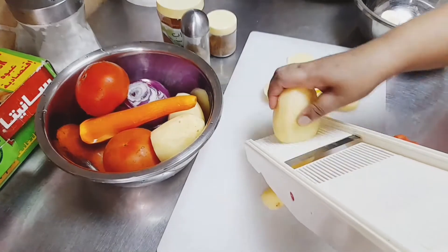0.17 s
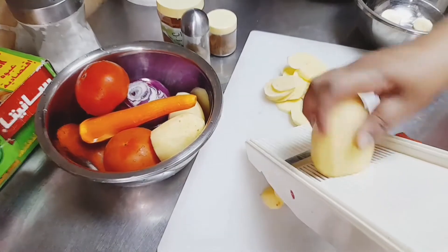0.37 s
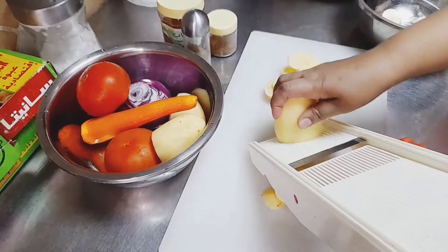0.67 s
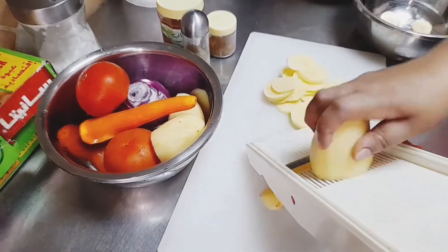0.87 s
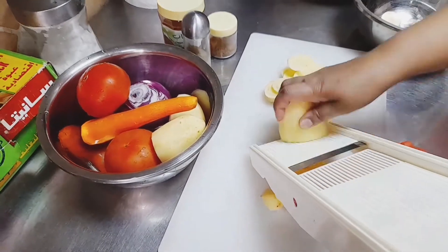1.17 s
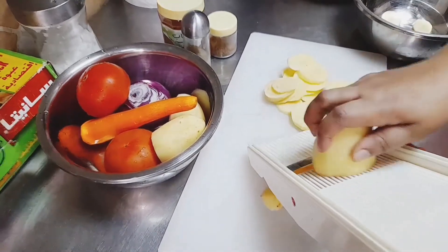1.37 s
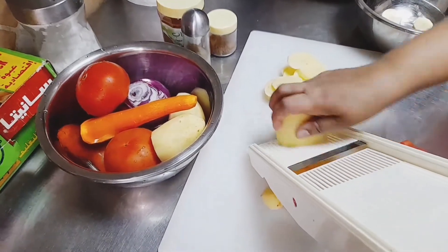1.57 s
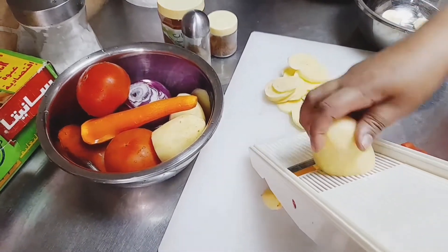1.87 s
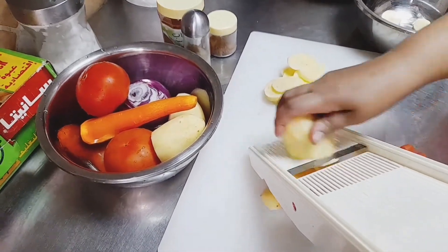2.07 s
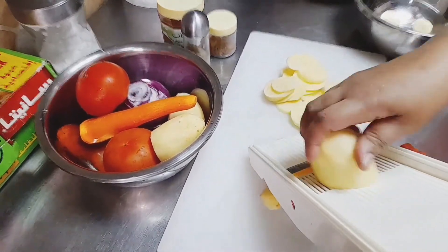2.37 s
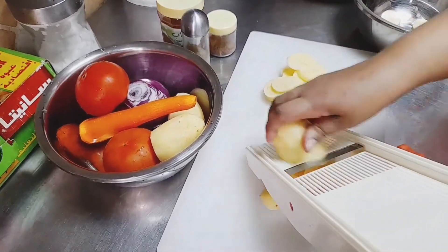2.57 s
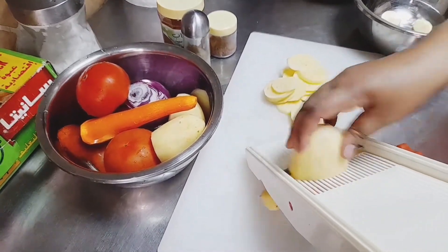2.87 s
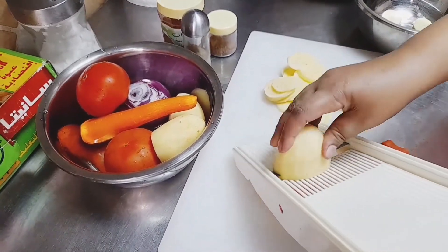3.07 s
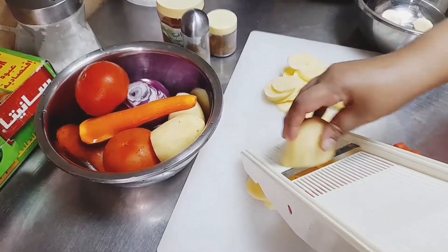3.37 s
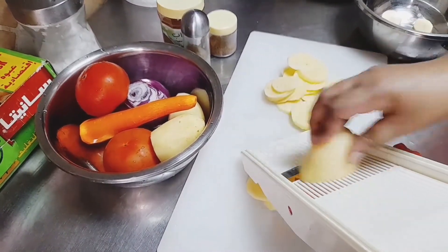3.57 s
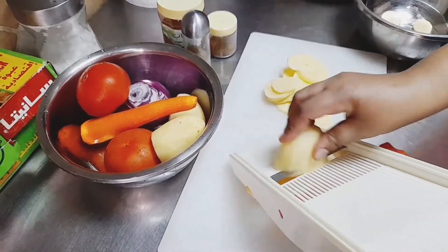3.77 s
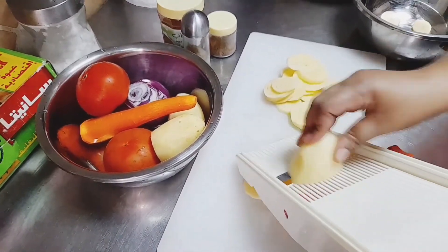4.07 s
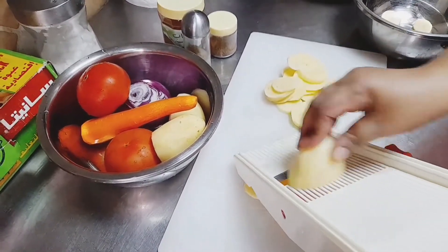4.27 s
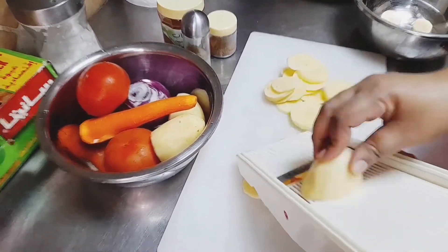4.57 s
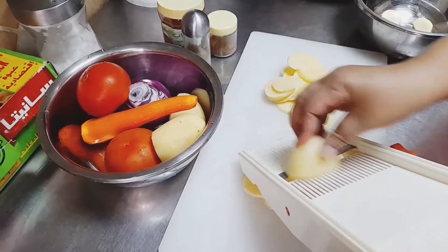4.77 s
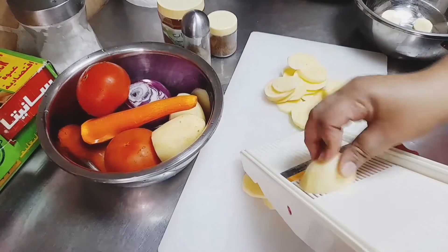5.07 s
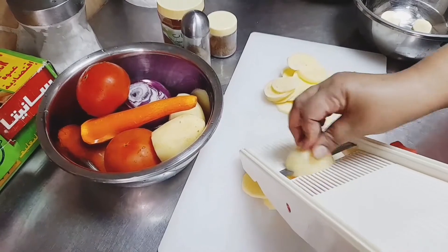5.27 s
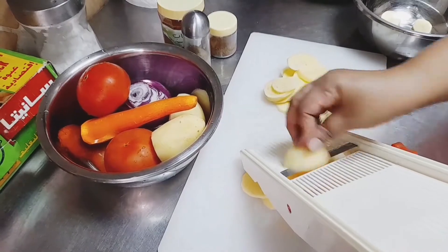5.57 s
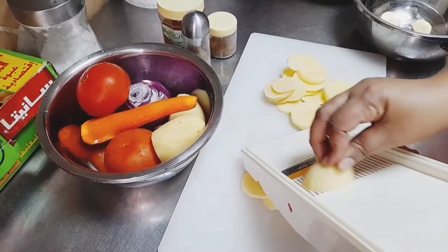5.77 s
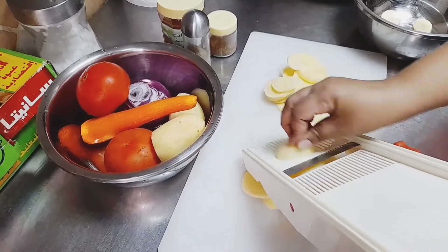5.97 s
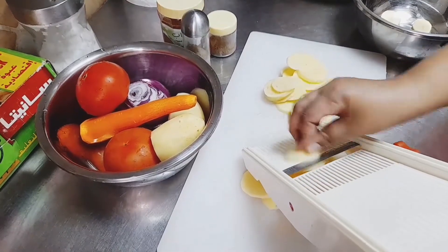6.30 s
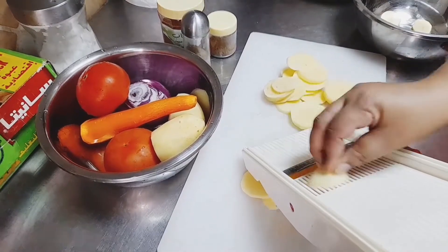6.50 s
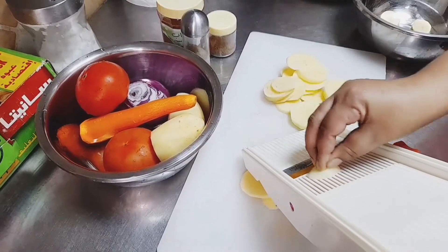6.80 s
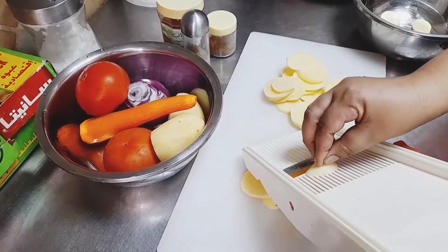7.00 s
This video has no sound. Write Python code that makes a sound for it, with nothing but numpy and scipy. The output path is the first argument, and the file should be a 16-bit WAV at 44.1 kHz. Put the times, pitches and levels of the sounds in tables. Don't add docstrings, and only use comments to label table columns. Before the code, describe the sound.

Close stereo phone pickup in a small hard kitchen. A potato strikes a slicer blade with a sharp plastic knock and wet crack, then rasps briefly along the ribs; softer return drags follow. Strokes come about every half second, quicker and shorter in the later part. Dull drops on the board, a few light steel clinks and a low counter boom lie beneath, with quiet fridge drone.

```python
import sys
import numpy as np
from scipy import signal
from scipy.fft import rfft, irfft, next_fast_len
from scipy.io import wavfile
from scipy.ndimage import uniform_filter1d

SR = 44100
rng = np.random.default_rng(int(sys.argv[2]) if len(sys.argv) > 2 else 0)


def waveform_to_disk(signal):
    frames = np.transpose(np.atleast_2d(signal))
    scaled = np.clip(frames, -1, 1) * 32767
    samples = np.round(scaled).astype(np.int16)
    wavfile.write(sys.argv[1], SR, samples)


def natural_amplitude(level_db):
    exponent = np.asarray(level_db, float) / 20
    return 10 ** exponent


N = 314765


def unit(x):
    return x / np.sqrt(np.mean(x ** 2) + 1e-20)


def along(points, hz):
    f, v = np.transpose(points)
    return np.interp(np.log(hz + 1), np.log(f + 1), v)


def wobble(rate):
    knots = int(N * rate / SR) + 2
    return 1.51 * np.interp(np.arange(N) * rate / SR, np.arange(knots), rng.standard_normal(knots))


def filtered(x, response):
    m = next_fast_len(N + SR // 2)
    gain = response(np.fft.rfftfreq(m, 1 / SR))
    gain = gain / np.sqrt(np.mean(abs(gain) ** 2))
    return irfft(rfft(x, m) * gain, m)[..., :N]


def ringing(modes):
    def response(f):
        return sum((-1) ** k * natural_amplitude(db) * 1j * f * width / (centre ** 2 - f * f + 1j * f * width)
                   for k, (centre, width, db) in enumerate(modes))
    return response


def colour(spectrum):
    return lambda f: natural_amplitude(along(spectrum, f))


def grit(spiky_db):
    size = natural_amplitude(spiky_db * wobble(900) + .5 * spiky_db * wobble(120))
    return unit(size * rng.standard_normal((2, N)))


def patchy(x, depth_db):
    z = signal.stft(x, nperseg=256)[2]
    field = uniform_filter1d(rng.standard_normal(z.shape[1:]), size=5, axis=0)
    field = uniform_filter1d(field, size=8, axis=1)
    return signal.istft(z * natural_amplitude(depth_db * unit(field)), nperseg=256)[1][:, :N]


def bursts(s, peak_db, length, rise, response, size=4096):
    ms = np.arange(size) / SR * 1000
    fall = natural_amplitude(peak_db[:, None] - 60 * ms / np.maximum(length, 5)[:, None])
    shape = fall * (1 - np.exp(-ms / np.reshape(rise, (-1, 1)))) ** 2
    push = shape[:, None] * rng.standard_normal((len(s), 2, size))
    rung = irfft(rfft(push) * response(np.fft.rfftfreq(size, 1 / SR)), size)
    energy = np.linalg.norm(shape, axis=1)[:, None, None]
    rung = rung * energy / np.linalg.norm(rung, axis=2, keepdims=True)
    out = np.zeros((2, N + SR))
    for at, one in zip(np.round(s * SR).astype(int), rung):
        out[:, at:at + size] += one
    return out[:, :N]


def tones(rows, rise, width_hz, size=4096):
    s, db, hz, length = np.transpose(rows)
    return bursts(s, db, length, rise, ringing([(hz[:, None, None], width_hz, 0)]), size=size)


# f/Hz, level/dB
AIR_SPECTRUM = [(15, -23), (25, -52), (55, 7.5), (124, -41), (159, -1.5), (192, -10), (313, -6.5),
                (433, -17.5), (483, -16), (1180, -26), (3910, -39), (15800, -32), (16100, -69.5)]
# f/Hz, level/dB
DRONE_TONES = [(161.5, -63), (11343, -87)]


def fridge():
    t = np.arange(N) / SR
    drone = sum(natural_amplitude(db + 6.5 + 1.9 * wobble(2)) * np.sin(2 * np.pi * hz * t + 0.34 * wobble(2.9))
                for hz, db in DRONE_TONES)
    air = natural_amplitude(-54.5) * filtered(rng.standard_normal((2, N)), colour(AIR_SPECTRUM))
    return air + drone * [[1], [0]]


# t/s, length/ms, rasp level/dB, frame level re rasp/dB
CUTS = [(0, 108, -33.5, -8.5), (0.929, 114, -35, -7), (1.388, 132, -35, -7), (2.403, 94, -34.5, -6),
        (2.837, 71, -33.5, -4), (3.557, 67.4, -32.5, -8), (4.033, 83, -32.5, -16), (4.371, 19.2, -35, -5.5),
        (4.601, 53.6, -31.5, -1), (4.866, 57.5, -33, -8.5), (5.112, 55, -34, -6.5),
        (5.413, 28.7, -36.5, -2.5), (5.68, 33, -53.5, -14), (5.802, 36, -42, -0.5), (5.861, 61, -35.5, -15),
        (6.232, 69, -34.5, -4), (6.517, 60.4, -36.5, -4)]
# t/s, rise/ms, length/ms, rasp level/dB, frame level re rasp/dB
RETURNS = [
    (0.47, 1.9, 120, -36.5, -11.5),
    (1.949, 33, 116, -34.5, -15),
    (2.509, 14, 65, -37, -9),
    (3.109, 18, 58, -36, -47),
    (3.745, 38, 55, -36.5, -15),
    (6.713, 36, 29, -39.5, -6),
]
# t/s, length/ms, rasp level/dB, swell/dB
BRUSHES = [(1.16, 50, -59, -14.5), (1.34, 29, -55, -16), (2.252, 107, -63.5, 17.5), (3.02, 73, -51.5, -2.5),
           (3.3, 270, -80.5, 33.5), (4.22, 80, -57, 5), (4.43, 35, -54, 1.5), (4.5, 37, -52.5, 5),
           (5.29, 65, -57, -6), (5.47, 300, -66.5, 7.5), (7.07, 65, -81, 17.5)]


def strokes():
    cut_rise_ms, cut_sag_db = 8.9, 2
    brush_rise_ms, brush_frame_db = 30, -1.5
    cuts = [(s, cut_rise_ms, ms, db, db - cut_sag_db, frame_db) for s, ms, db, frame_db in CUTS]
    returns = [(s, rise, ms, db, db, frame_db) for s, rise, ms, db, frame_db in RETURNS]
    brushes = [(s, brush_rise_ms, ms, db, db + swell_db, brush_frame_db) for s, ms, db, swell_db in BRUSHES]
    return cuts + returns + brushes


# f/Hz, level/dB
RASP_SPECTRUM = [(1060, -4), (1800, -0.5), (3000, -1), (3380, 0.5), (5680, -1.5), (6530, 1), (8700, -6),
                 (11500, 0), (14300, -2.5), (15800, -3), (16100, -76)]
# f/Hz, width/Hz, level/dB
FRAME_MODES = [(712, 110, -7), (851, 45, -8), (1102, 24, -1.5), (1259, 61, 3), (1455, 83, -1),
               (1735, 147, -6.5), (2028, 32, -3), (2394, 93, -12)]
# f/Hz, width/Hz, level/dB
HOLLOW_MODES = [(248, 94, -12), (313.3, 26.4, -0.5), (468, 74, -1), (613, 28, -6)]


def slide():
    ms, rub, shake = np.arange(N) / SR * 1000, np.zeros(N), np.zeros(N)
    for s, rise, length, early_db, late_db, frame_db in strokes():
        corners = 1000 * s + np.array([-1, 0, min(rise, length), length, length + 14])
        levels = [-150, early_db - 7, early_db, late_db, late_db - 14.5]
        level = natural_amplitude(np.interp(ms, corners, levels, right=-150))
        rub = rub + level
        shake = shake + natural_amplitude(frame_db) * level
    drag = natural_amplitude(0.65 * wobble(30) + 0.65 * wobble(80))
    torn = patchy(grit(spiky_db=0.13), depth_db=2.0)
    rasp = filtered(natural_amplitude(-1.5) * rub * drag * torn, colour(RASP_SPECTRUM))
    frame = filtered(natural_amplitude(-3.5) * shake * drag * grit(spiky_db=-2.5), ringing(FRAME_MODES))
    hollow = filtered(natural_amplitude(-8.0 + 4.4 * wobble(25)) * shake * grit(spiky_db=6.5), ringing(HOLLOW_MODES))
    return rasp + frame + hollow


# t/s of most weight, level/dB
SHOVES = [(.02, -40.5), (.2, -37.5), (.43, -35.5), (.58, -35), (.89, -37.5), (1.05, -39), (1.16, -41),
          (1.39, -35.5), (1.75, -45), (2.09, -41.5), (2.46, -39.5), (2.63, -45), (2.83, -31), (3.26, -38.5),
          (3.5, -43), (3.61, -42), (3.82, -41.5), (4.06, -35), (4.472, -41.5), (4.58, -35.5), (4.831, -35),
          (4.99, -41.5), (5.11, -37.5), (5.47, -43.5), (5.69, -42), (5.97, -40.5), (6.18, -40.5),
          (6.33, -44.5), (6.5, -39.5), (6.78, -45.5)]


def pressure():
    lean_db_per_s, ease_db_per_s, rest_db = 122, 87, -61.5
    t, weight = np.arange(N) / SR, natural_amplitude(rest_db)
    for s, db in SHOVES:
        loss_db = np.where(t < s, lean_db_per_s * (s - t), ease_db_per_s * (t - s))
        weight = np.maximum(weight, natural_amplitude(db - loss_db))
    return weight


# f/Hz, width/Hz, level/dB
COUNTER_MODES = [(67.8, 4.5, 3.5), (110.7, 32, -6)]


def counter():
    hum = filtered(grit(spiky_db=3.5), ringing(COUNTER_MODES))
    even = unit(hum / np.abs(uniform_filter1d(hum ** 2, size=3000)) ** 0.37)
    return uniform_filter1d(pressure(), size=800) * natural_amplitude(1.4 * wobble(14) - 0.4) * even


# t/s, level/dB, f/Hz, push/ms
THUDS = [(0.18, -25, 318, 26), (0.317, -28, 466, 58), (0.335, -37.5, 500, 98), (0.636, -23.5, 314, 89),
         (0.664, -60, 304, 60), (0.698, -40.5, 322, 30), (0.813, -33.5, 474, 96), (0.932, -25.5, 468, 52),
         (1.3, -32, 430, 48), (2.257, -45, 456, 60), (2.859, -23.5, 480, 50), (3.583, -32, 361, 61),
         (4.036, -29, 430, 67), (4.264, -41, 233, 120), (5.07, -12, 468, 38), (5.322, -36, 312, 91),
         (5.399, -29, 340, 78), (5.428, -36, 314, 83), (5.635, -21.5, 437, 55), (6.33, -56.5, 151.6, 60)]


def board():
    return natural_amplitude(-4.0) * tones(THUDS, rise=1.5, width_hz=150)


# t/s, level/dB, push/ms
CLINKS = [
    (.199, -19, 55),
    (0.206, -12, 17),
    (0.574, -36, 89),
    (6.028, -31.5, 32),
    (6.828, -41, 23),
]
# t/s, level/dB, f/Hz, t60/ms
TINKS = [
    (0.25, -60, 2400, 310),
    (0.47, -50.5, 3000, 270),
    (6.84, -40.5, 1000, 94),
    (6.827, -36, 1700, 32),
    (6.736, -30, 565, 40),
]
# f/Hz, width/Hz, level/dB
BLADE_MODES = [(2110, 120, 7), (2830, 330, 1), (3250, 51, 12), (4430, 470, -6)]


def blade():
    s, db, length = np.transpose(CLINKS)
    clinks = bursts(s, db, length, 1.9, ringing(BLADE_MODES))
    return clinks + tones(TINKS, rise=0.65, width_hz=28, size=16384)


# t/s, frame knock level/dB, thud re knock/dB, crack re knock/dB, push/ms
TAPS = [
    (0.2, -24, -11, -2.5, 47),
    (0.559, -39, -5, -12, 82),
    (.813, -90, -9, 4.5, 15),
    (1.045, -26, 4, -5, 27),
    (1.301, -69, -5, 15.5, 46),
    (6.032, -26.5, -28, -11.5, 12.3),
    (6.827, -29.5, -6, -16.5, 26.4),
]
# t/s, frame knock level/dB, crack re knock/dB
CATCHES = [(0.249, -47.5, 4), (0.501, -35, 6), (0.633, -36, -25), (0.85, -30, -1.5), (1.439, -37, 7),
           (1.671, -58.5, -9), (2.344, -30, -3), (2.615, -43, -16), (2.713, -44, -3.5), (3.149, -36, 4),
           (3.196, -26.5, -25.5), (3.564, -32.5, 0.5), (4.064, -43, 3), (4.353, -30.5, -7.5),
           (4.575, -31.5, 1), (4.719, -34, -27), (5.383, -35, 1), (5.805, -36, -11), (5.894, -28.5, -19),
           (5.93, -32.5, 3)]
# t/s, frame knock level/dB, thud re knock/dB
CHOPS = [(0.364, -16, -13.5), (0.861, -15.5, -8.5), (1.366, -15.5, -8.5), (1.865, -20, -10.5),
         (2.329, -18.5, -11.5), (2.784, -18, -8.5), (3.466, -28.5, -2), (3.478, -24, -12),
         (3.99, -15.5, -7), (4.544, -16.5, -7), (4.797, -19.5, -6.5), (4.808, -16, -7),
         (5.052, -19.5, -6.5), (5.607, -16, -13.5), (6.144, -19.5, -15.5), (6.168, -23.5, -1),
         (6.455, -20, -5)]
# t/s, frame knock level/dB, thud re knock/dB, crack re knock/dB
BUMPS = [
    (0.574, -17, -12.5, -8),
    (1.054, -15.5, -11, -3),
    (3.163, -19, -12.5, -9),
    (3.78, -33.5, -3, 2),
    (6.437, -24.5, -5, -1.5),
    (6.735, -28.5, -10.5, -20),
]


def blows():
    chop_crack_db, chop_ms = -0.5, 52.7
    catch_thud_db, catch_ms, wet_ms_per_db = -1.5, 45, 1.07
    chops = [(s, db, thud_db, chop_crack_db, chop_ms, .45) for s, db, thud_db in CHOPS]
    catches = [(s, db, catch_thud_db, crack_db, catch_ms + wet_ms_per_db * crack_db, .45)
               for s, db, crack_db in CATCHES]
    bumps = [(*bump, 48.3, 1.8) for bump in BUMPS]
    taps = [(*tap, .5) for tap in TAPS]
    return chops + catches + bumps + taps


# f/Hz, width/Hz, level/dB
SLAP_MODES = [(678, 230, 2.5), (1720, 2000, -5)]
# f/Hz, width/Hz, level/dB
SNAP_MODES = [(12500, 4500, 0)]
# f/Hz, level/dB
CRACK_SPECTRUM = [(1290, -75.5), (2200, -16), (2880, -12.5), (3440, 2), (6310, 1.5), (9460, -5.5),
                  (13300, 2.5), (15800, -6.5), (16400, -33.5)]


def contacts():
    s, db, thud_db, crack_db, length, rise = np.transpose(blows())
    load = bursts(s - .0045, db - 15.5, 0.47 * length, 0.76, ringing(FRAME_MODES), size=2048)
    thud = bursts(s - .0035, db + thud_db + 4, 1.36 * length, rise + 1.6, ringing(HOLLOW_MODES))
    slap = bursts(s - .0011, db - 3.5, 0.99 * length, rise, ringing(SLAP_MODES), size=2048)
    knock = bursts(s - .0011, db - .6, length, rise, ringing(FRAME_MODES))
    snap = bursts(s - .0008, db + crack_db - 7, 0.19 * length, 0.21 * rise, ringing(SNAP_MODES), size=2048)
    crack = bursts(s - .0008, db + crack_db - 3, 1.16 * length, 0.32 * rise, colour(CRACK_SPECTRUM))
    return load + thud + slap + knock + snap + crack


# f/Hz, t60/s
ROOM_DECAY = [(200, 0.49), (1500, 0.29), (6000, 0.33), (15000, 0.21)]


def kitchen(x, count=24):
    size = N // count + 1
    hz, t, z = signal.stft(rng.standard_normal((2, count, size)), SR, nperseg=256)
    decay = natural_amplitude(-60 * t / along(ROOM_DECAY, hz)[:, None])
    tail = signal.istft(z * decay, SR, nperseg=256)[1][..., :size]
    pieces = np.pad(x, ((0, 0), (0, count * size - N))).reshape(2, count, size)
    wet = np.pad(signal.fftconvolve(pieces, tail, axes=2), ((0, 0), (0, 0), (0, 1)))
    wet = wet / np.linalg.norm(tail[0, 0])
    now = np.pad(wet[..., :size].reshape(2, -1), ((0, 0), (0, size)))
    spill = np.pad(wet[..., size:].reshape(2, -1), ((0, 0), (size, 0)))
    return np.pad(now + spill, ((0, 0), (300, 0)))[:, :N]


# f/Hz, likeness/0-1
LIKENESS = [(60, 0.96), (130, 0.88), (290, 0.97), (640, 0.81), (1410, 0.014), (3100, 0.68), (6820, 0.35),
            (9000, .7) ]
# f/Hz, phase/rad
LEFT_LEAD = [(60, 0.2), (700, -0.92), (2000, -1.16), (5000, -1.7), (8500, -.8), (14000, -1.0) ]
# f/Hz, level/dB
LEFT_TILT = [(60, -4.5), (110, 2), (200, -3), (380, -5.5), (700, 2), (1290, -3), (2380, 0.5), (4400, -0.5),
             (8120, -1.5), (15000, 0.3)]
# f/Hz, level/dB
PHONE_COLOUR = [(790, 0.5), (900, -3.5), (1020, -1), (1110, 0), (6600, 0.5), (7400, 4), (8200, -0.5),
                (11500, 1)]


def ports(pair):
    m = next_fast_len(N + SR // 2)
    hz = np.fft.rfftfreq(m, 1 / SR)
    band = (hz < 16650) * natural_amplitude(-19 * (hz > 16000))
    rumble_cut = 1 + (33 / (hz + 1)) ** 3
    shared, other = rfft(pair, m) * band * natural_amplitude(along(PHONE_COLOUR, hz)) / rumble_cut
    turn = np.arccos(np.clip(along(LIKENESS, hz), 0, 1)) / 2
    left = natural_amplitude(along(LEFT_TILT, hz) / 2) * np.exp(.5j * along(LEFT_LEAD, hz))
    mid, side = np.cos(turn) * shared, np.sin(turn) * other
    return irfft([(mid + side) * left, (mid - side) / left], m)[:, :N]


def scene():
    slicer = slide() + board() + blade() + contacts()
    return fridge() + counter() + natural_amplitude(1.44) * (slicer + natural_amplitude(-6.5) * kitchen(slicer))


def roll_off(x):
    return signal.sosfilt(signal.butter(12, 16830, fs=SR, output="sos"), x)


def record(dry):
    mix = ports(dry)
    return roll_off(mix)


dry = scene()
out = record(dry)
waveform_to_disk(out)
```